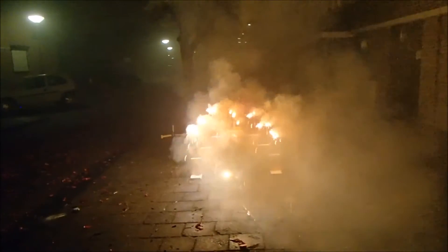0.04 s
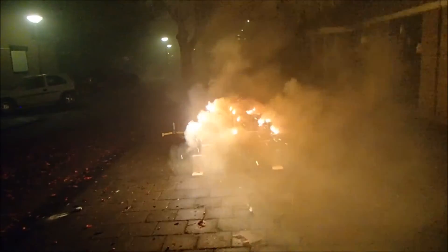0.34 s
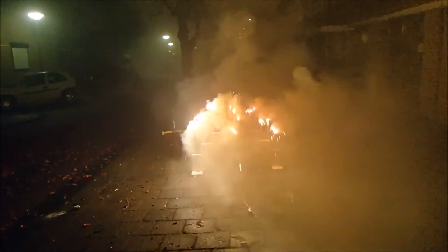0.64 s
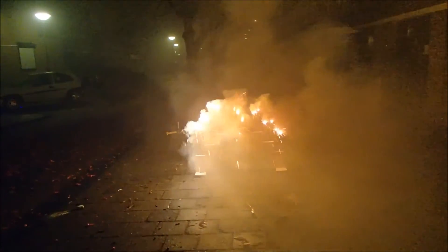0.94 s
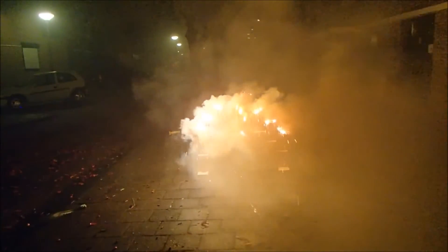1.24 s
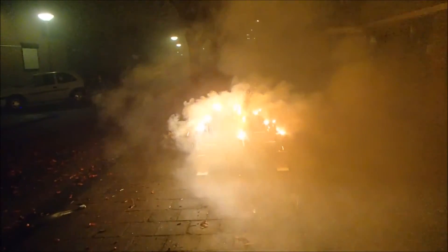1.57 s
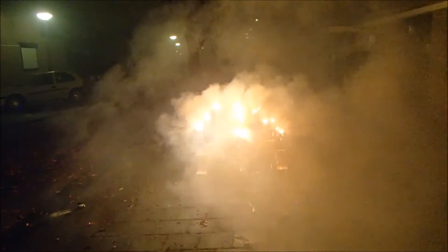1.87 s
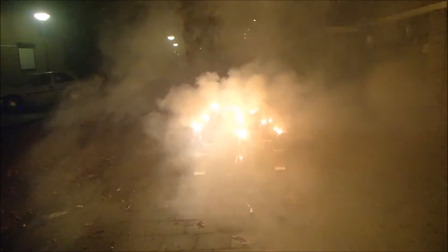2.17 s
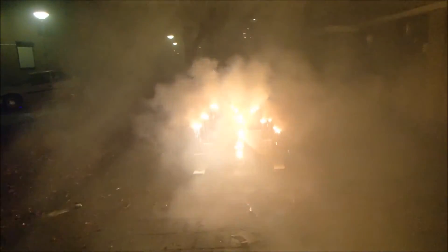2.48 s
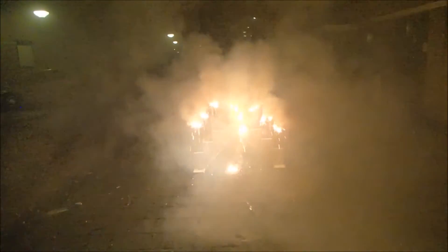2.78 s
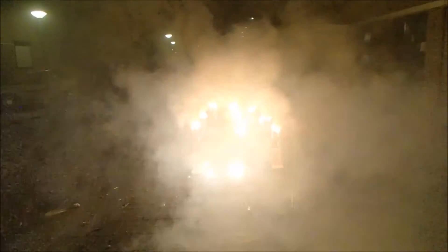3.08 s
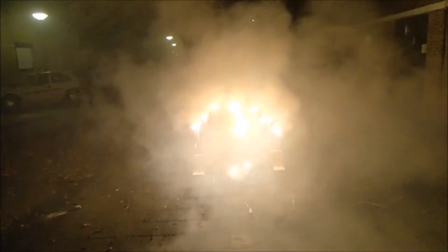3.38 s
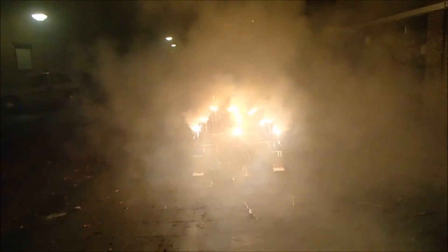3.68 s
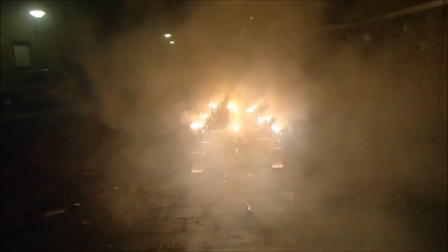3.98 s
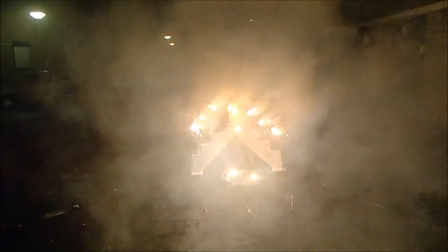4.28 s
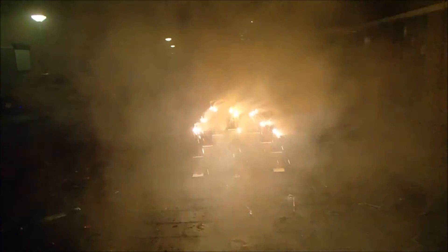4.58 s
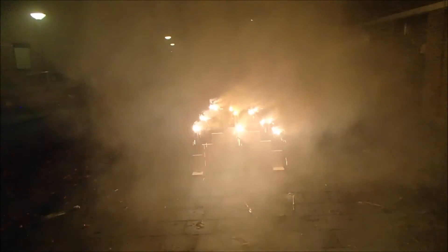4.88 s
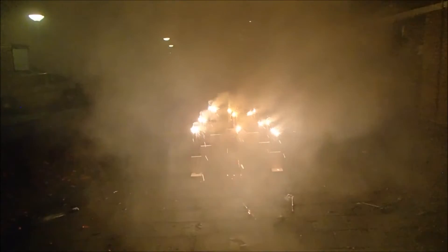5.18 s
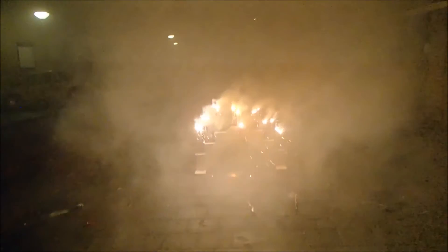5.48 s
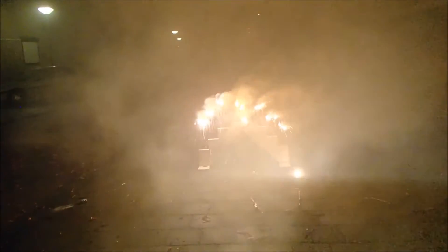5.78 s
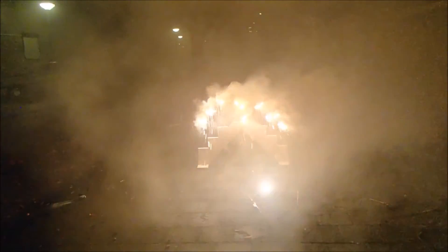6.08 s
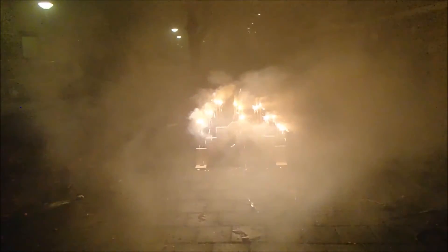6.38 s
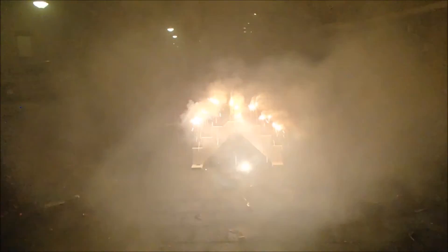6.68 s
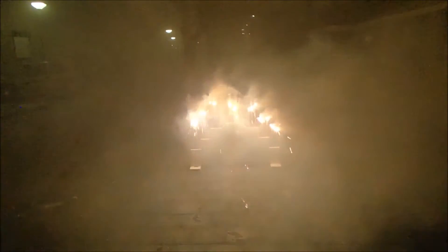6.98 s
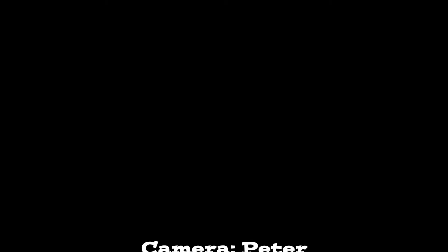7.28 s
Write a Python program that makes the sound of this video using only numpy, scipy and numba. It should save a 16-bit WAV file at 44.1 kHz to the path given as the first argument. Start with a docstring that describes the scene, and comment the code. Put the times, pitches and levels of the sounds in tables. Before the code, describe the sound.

Fountain fireworks burn on a street with sharp, clustered cracks and pops over a steady hiss and fluttering flames.

```python
"""A rack of fountain fireworks burns on a paved street at night, a few metres from a small camera.
From the start jets hiss, flames flutter and a few stars crack, each answered by a wall and the street's
tail. From 2 s the cracks come in quick clusters, with low thumps as some overload the microphone.
Loud cracks pull the camera's gain down, so the flames swell back in the gaps. Fresh powder flares up
strongly at 4.4 s and 6.6 s. The sound cuts off at 7.08 s."""
import sys
import numpy as np
from scipy import signal
from scipy.fft import rfft, irfft
from scipy.io import wavfile
from scipy.ndimage import uniform_filter1d
from numba import njit

SR = 44100
rng = np.random.default_rng(int(sys.argv[2]) if len(sys.argv) > 2 else 0)


def unload_audio(sound):
    """Save the sound as a 16-bit wav file, at the path given as the first command line argument."""
    columns = np.transpose(np.atleast_2d(sound))
    # keep every value between -1 and 1, then stretch to whole-number steps
    steps = np.round(np.clip(columns, -1, 1) * 32767)
    wavfile.write(sys.argv[1], SR, steps.astype(np.int16))


N = 328104
TIME = np.arange(N) / SR


def undb(db):
    """Decibels to gain."""
    return 10 ** (np.asarray(db) / 20)


def unit(x):
    """Scale to rms 1."""
    return x / np.sqrt(np.mean(x ** 2))


def fade(t, t60_s):
    """Exponential decay, 60 dB down at t60_s."""
    return np.exp(-np.log(1000) * t / t60_s)


def add(out, start_s, x):
    """Mix x into out at start_s."""
    i = int(start_s * SR)
    out[i:i + len(x)] += x[:len(out) - i]


def colour(x, points, size=4096):
    """Minimum-phase filter through (f/Hz, level/dB) points; keeps the power of white noise."""
    hz, db = np.transpose(points)
    grid_hz = np.maximum(np.arange(size // 2 + 1) * SR / size, 1)
    gain = undb(np.interp(np.log(grid_hz), np.log(hz), db))
    cepstrum = irfft(np.log(gain))
    cepstrum[1:size // 2] *= 2
    cepstrum[size // 2 + 1:] = 0
    response = irfft(np.exp(rfft(cepstrum)))
    return signal.oaconvolve(x, response / np.linalg.norm(response))[:len(x)]


def smear(x, tau_s):
    """One-pole low-pass, by time constant."""
    keep = np.exp(-1 / (tau_s * SR))
    return signal.lfilter([1 - keep], [1, -keep], x)


def lowpass(x, hz):
    """One-pole low-pass, by corner frequency."""
    return smear(x, 1 / (2 * np.pi * hz))


def walk(rate_hz):
    """Random steps, smoothed twice; rms 1."""
    hold = max(int(SR / rate_hz), 2)
    steps = np.repeat(rng.standard_normal(N // hold + 1), hold)
    return unit(uniform_filter1d(uniform_filter1d(steps, hold), hold)[:N])


def spray(per_s, spread_db):
    """Random ticks, mostly small, a few large; rms 1."""
    sizes = undb(spread_db * np.minimum(rng.exponential(size=N), 4))
    hits = rng.random(N) < per_s / SR
    signs = np.sign(rng.random(N) - .5)
    return unit(hits * sizes * signs)


# Jet spectrum: f/Hz, level/dB
JET_SPECTRUM = [(40, -12), (200, -21), (700, 1), (2500, -4), (5500, -18.5), (8000, -14.5), (16000, -6.5)]


def jets(level_db=-33, spark_db=-5, flicker_db=1):
    """Gas hisses from the nozzles, carrying tiny ticking sparks."""
    gas = rng.standard_normal(N) * undb(flicker_db * walk(rate_hz=22))
    sparks = undb(spark_db) * spray(per_s=430, spread_db=6)
    return undb(level_db) * colour(gas + sparks, JET_SPECTRUM)


# Flame between flares, sinking as the fountains settle: t/s, level/dB
FLAME_BASE = [(0, -27.5), (1.8, -24.5), (2.6, -27.5), (7.08, -29)]
# Flares: peak t/s, level/dB, rise/s, T60/s
POWDER_FLARES = [(0.18, -16, .04, .25), (0.262, -18, 0.057, .1), (0.425, -11, 0.056, .3),
                 (0.495, -19.5, 0.046, .22), (0.729, -14, 0.0099, 0.047), (0.756, -5.5, 0.015, 0.086),
                 (.835, -22.5, 0.014, .35), (.91, -22.5, 0.055, .55), (1.28, -10.5, 0.066, .25),
                 (1.39, -19.5, 0.087, .3), (1.428, -16, 0.0055, .35), (1.54, -29, 0.061, .3),
                 (2.06, -17, .12, .2), (4.43, -4.5, .07, .45), (4.96, -13.5, .13, .3),
                 (5.25, -17, 0.13, .4), (5.41, -17.5, 0.22, .2), (6.43, -9, .07, .2),
                 (6.599, 2, 0.1093, .25)]
# Flame spectrum: f/Hz, level/dB
FLAME_SPECTRUM = [(30, -22), (80, -15), (160, -3.5), (300, 1.5), (600, 2.5), (1100, 2.5), (2000, -3.5),
                  (3500, -18.5), (8000, -38.5)]


def flames(flutter_db=2.5, roar_db=-2, sputter_db=-7, low_cut_hz=80):
    """Turbulent flame flutters, sputters and flares as fresh powder catches."""
    strength = undb(np.interp(TIME, *np.transpose(FLAME_BASE)))
    for peak_s, db, rise_s, t60_s in POWDER_FLARES:
        age_s = TIME[:SR] - rise_s
        swell = np.minimum(1 + age_s / rise_s, 1) ** 2
        decay = fade(np.maximum(age_s, 0), t60_s)
        add(strength, max(peak_s - rise_s, 0), undb(db) * swell * decay)
    strength *= undb(flutter_db * walk(rate_hz=90))
    roar = undb(roar_db) * rng.standard_normal(N)
    sputter = undb(sputter_db) * spray(per_s=300, spread_db=6.5)
    burning = strength * (roar + sputter)
    burning -= lowpass(burning, low_cut_hz)  # a small flame radiates little deep bass
    return colour(burning, FLAME_SPECTRUM)


# Tail from the house fronts: f/Hz, level/dB
FRONTS_SPECTRUM = [(40, -40), (200, -6.5), (450, -9), (900, 2), (1600, 5), (2800, 6.5), (5500, -3),
                   (8000, -6), (16000, -10)]


def street(energy, paving_t60_s=.12, paving_db=-2, fronts_t60_s=.8, fronts_db=-2.5, build_s=.021):
    """Paving and pillars scatter a short bright tail; house fronts answer later, longer and darker."""
    tau_per_t60 = 1 / (2 * np.log(1000))  # for energy
    near = smear(energy, paving_t60_s * tau_per_t60)
    arriving = smear(energy, build_s)
    arriving[0] += undb(14) ** 2  # earlier bursts still ring
    far = smear(arriving, fronts_t60_s * tau_per_t60)
    paving = colour(np.sqrt(near) * rng.standard_normal(N), CRACK_SPECTRUM)
    fronts = np.sqrt(far) * rng.standard_normal(N) * undb(walk(rate_hz=450))
    return undb(paving_db) * paving + undb(fronts_db) * colour(fronts, FRONTS_SPECTRUM)


# Microphone overload thumps: t/s, level/dB, first lobe/ms
OVERLOAD_THUMPS = [(2.069, 9, 0.6), (2.893, 18, .6), (4.612, 19, 0.94), (4.643, 20, 0.96), (4.990, 9, 1.2),
                   (5.018, 11, 1.0), (6.187, 11.5, 1), (6.641, 18, 0.7), (6.885, 19, 0.93)]


def thumps(edge_hz=2500):
    """Low thumps as some cracks overload the microphone: a jump, then a shallow undershoot."""
    pulses = np.zeros(N)
    for start_s, db, lobe_ms in OVERLOAD_THUMPS:
        age = TIME[:SR // 20] / (lobe_ms / 1000)
        add(pulses, start_s, undb(db) * (1 - age) * np.exp(-age))
    return lowpass(pulses, edge_hz)


def crack_times(start_s, length_s, gap_s=.0215, slowing=1.6):
    """One star's string of cracks; the gaps grow as it burns out."""
    count = 1 + int(np.ceil(max(length_s, 0) / gap_s))
    return start_s + length_s * np.linspace(0, 1, count) ** slowing


def crack(bright_db, shock=3, body_hz=3600, snap_t60_s=.004, scatter_t60_s=.013, scatter_db=-8):
    """Shock front, snap of gas, scatter from rack and paving; energy 1."""
    t = TIME[:1024]
    envelope = fade(t, snap_t60_s) + undb(scatter_db) * fade(t, scatter_t60_s)
    snap = rng.standard_normal(len(t)) * envelope
    snap[0] = -shock
    body = lowpass(snap, body_hz)
    pressure = body + undb(np.clip(bright_db, -5, 6)) * (snap - body)
    return pressure / np.linalg.norm(pressure)


# Stars: t/s, level/dB, share thrown at the wall/dB, string length/s (0 = one crack)
STAR_BURSTS = [(0.039, -5.5, -5.5, 0), (0.2708, -4, -7, 0.002), (0.9655, -10.5, -9.5, 0.00025),
               (1.0577, -5, -2.5, 0.038), (1.588, -6.5, -6, 0), (1.6547, -6.5, -3.5, 0.00024),
               (1.703, -12.5, 2.5, 0), (1.8293, -5, -8.5, 0.017), (1.9155, -1, -6, 0),
               (2.0699, -2, -4, 0.015), (2.1211, -4, -6.5, 0), (2.1546, 2, -6, 0), (2.216, -2.5, -5, 0.036),
               (2.274, -5.5, -16.5, 0), (2.3004, -3.5, -1, 0.00745), (2.347, -4.5, -3, 0),
               (2.3908, -7, -15.5, 0.0016), (2.44, -5, -14, 0.00078), (2.472, -9.5, -9, 0.0011),
               (2.552, -5, -3, 0.014), (2.6189, -1.5, -8, 0.013), (2.6772, -1.5, -5, 0.03),
               (2.7811, -5.5, 1, 0.037), (2.836, -0.5, -9.5, 0.022), (2.8933, 5, -8.5, 0),
               (2.981, -2, -2, 0.0012), (3.031, -7, 2, 0.037), (3.0788, 0.5, -10.5, 0.013),
               (3.2454, -2.5, -6.5, 0.00014), (3.2779, -4.5, -1.5, 0.027), (3.3443, -3.5, -5.5, 0.02),
               (3.4055, -8.5, -15, 0), (3.447, 0, -4.5, 0.04), (3.6471, 1.5, -5.5, 0.00021),
               (3.7203, -4, 0.5, 0.0061), (3.7822, -5.5, -3.5, .028), (3.863, -7.5, -2.5, .011),
               (3.9123, -1.5, -4.5, 0.02), (4.0081, -4, -6, 0.0037), (4.0542, -4.5, -7, 0.0049),
               (4.1312, -2.5, -6.5, 0.041), (4.2013, 2.5, -8.5, 0), (4.266, 2, -5, 0.008),
               (4.307, -1.5, -13, 0.0011), (4.4757, -4, -8, 0), (4.5171, -3.5, -1.5, 0.00046),
               (4.613, -8, -3.5, 0.04), (4.8022, -5.5, -11, .005), (4.991, -6.5, -2, 0.021),
               (5.424, -2, -8.5, 0.00065), (5.4457, -8.5, 0.5, 0.0061), (5.515, 0.5, -9, 0.00014),
               (5.5536, -4.5, -2.5, 0.03724), (5.688, -6, -7.5, 0.0088), (5.7599, -3, -6, 0.036),
               (5.849, -4, -4, .027), (5.8931, -1, -6, 0.0135), (6.0673, -9.5, -3.5, 0.0024),
               (6.1444, -7.5, -8, 0.00082), (6.1788, -1, -6, 0.0081), (6.2775, 2.5, -10, 0.00038),
               (6.446, 4.5, -6, 0), (6.5471, 0.5, -8.5, 0.01), (6.6304, -0.5, -7, 0.052),
               (6.7137, -1.5, -5.5, 0.0069), (6.802, -5.5, -3, 0.00014), (6.8841, -6, 0, 0),
               (7.0048, -2.5, -6, 0)]
# Wall and kerb reflections: delay/ms, level/dB
WALL_ECHOES = [(7.4, -14), (13.6, -1), (18.8, -7.5), (22.6, -14.5)]
# Spectrum of the cracks and their paving scatter: f/Hz, level/dB
CRACK_SPECTRUM = [(30, -16), (100, -11.5), (400, -10), (900, 3.5), (2500, 7), (5500, 1), (8000, 0),
                  (16000, 1)]


def stars(direct_db=38, wall_db=37, size_spread_db=1.2, path_spread_ms=.18, scatter_delay_s=.009):
    """Stars burst in strings of cracks. Returns sound with early echoes, and energy sent to the street."""
    sound, energy = np.zeros((2, N))
    for start_s, star_db, share_db, length_s in STAR_BURSTS:
        for at_s in crack_times(start_s, length_s):
            size, tone = rng.standard_normal(2)
            db = star_db + size_spread_db * size * (at_s > start_s)
            pulse = undb(db) * crack(bright_db=-1.5 - .3 * db + 2 * tone)  # smaller is brighter
            add(sound, at_s, undb(direct_db) * pulse)
            outward = undb(wall_db + share_db) * pulse
            add(energy, at_s + scatter_delay_s, outward ** 2)
            for delay_ms, echo_db in WALL_ECHOES:
                path_ms = delay_ms + path_spread_ms * rng.standard_normal()  # burst positions vary
                add(sound, at_s + path_ms / 1000, undb(echo_db) * outward)
    return colour(sound, CRACK_SPECTRUM), energy


def scene():
    """Cracks, street tail and thumps over the burning fountains; mono."""
    cracks, energy = stars()
    return (cracks + street(energy) + thumps() + flames() + jets())[None]


@njit
def follow(x, level, attack, release):
    """Peak follower: fast rise, steady fall in dB."""
    out = np.empty(len(x))
    for i in range(len(x)):
        size = abs(x[i])
        level = level + attack * (size - level) if size > level else level * release
        out[i] = level
    return out


# Microphone response, port ringing near 4 and 5 kHz: f/Hz, level/dB
MIC_RESPONSE = [(30, 3.5), (2400, -5), (3200, -2), (3850, 3.5), (4300, 0.5), (4750, -6.5), (5300, 6),
                (6200, 2), (7400, -1.5), (10500, -3.5), (13000, -3), (15500, -14)]


def record(dry, threshold=.86, attack_ms=.86, recovery_db_per_s=38, start_db=4, stop_s=7.08, top_hz=15800):
    """The camera's gain ducks too late for the cracks, which overload it; silence after stop_s."""
    heard = colour(dry[0], MIC_RESPONSE)
    attack = 1 - np.exp(-1000 / (attack_ms * SR))
    release = float(undb(-recovery_db_per_s / SR))
    peak = follow(heard, float(undb(start_db)), attack, release)
    gain = np.minimum(1, threshold / peak)
    heard = np.clip(heard * gain, -1, 1) * (TIME < stop_s)
    band_limit = signal.ellip(8, .2, 70, top_hz, fs=SR, output="sos")
    return signal.sosfilt(band_limit, heard)[None]


dry = scene()
out = record(dry)
unload_audio(out)
```